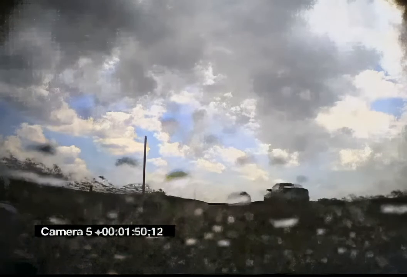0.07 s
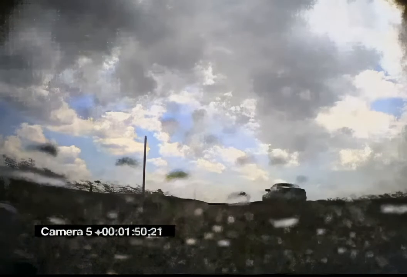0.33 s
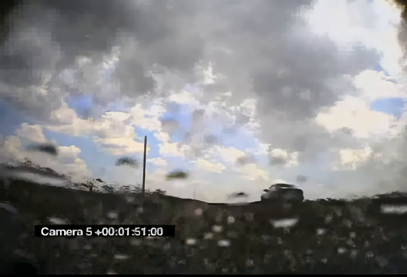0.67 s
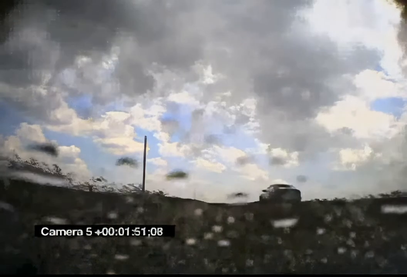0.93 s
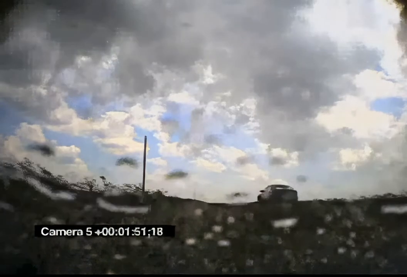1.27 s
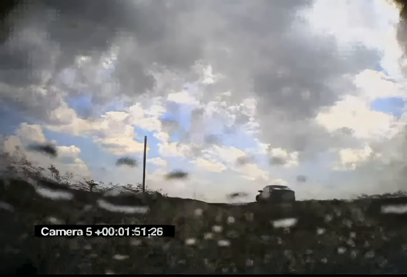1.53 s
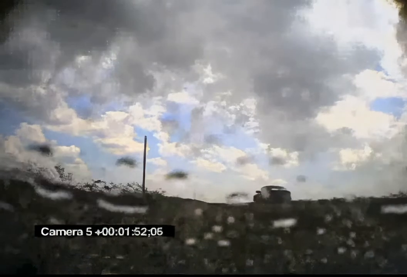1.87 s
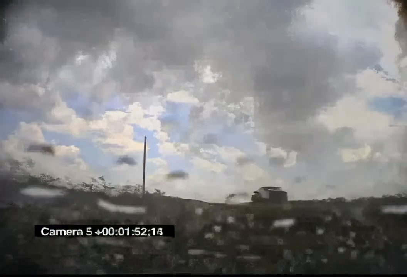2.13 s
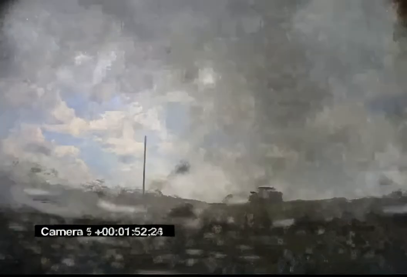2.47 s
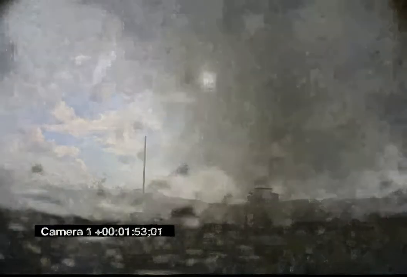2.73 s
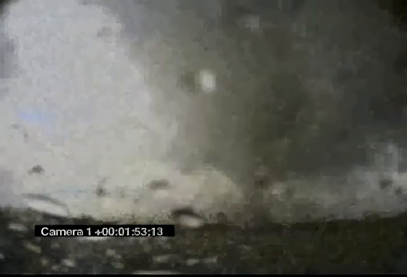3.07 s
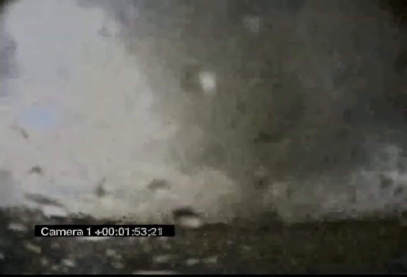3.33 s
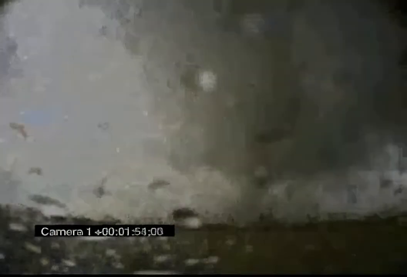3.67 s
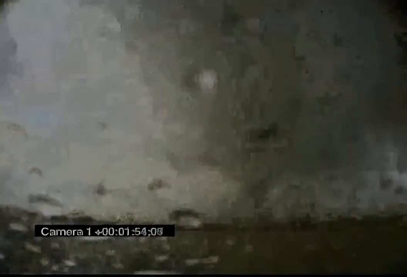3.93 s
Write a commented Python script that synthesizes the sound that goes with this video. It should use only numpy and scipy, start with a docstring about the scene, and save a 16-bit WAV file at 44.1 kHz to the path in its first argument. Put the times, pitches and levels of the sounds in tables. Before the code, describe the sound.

Heavy wind roars in uneven gusts over a microphone on the ground in open country, with deep, overloading thumps. Faint grit hisses and drops tick on the housing, more often in the second half, as the wind eases somewhat.

```python
"""Tornado over open country

A tornado crosses open country towards a camera on the ground, heard from its one microphone. Gusts roar over
the housing, tumble off it and buffet the microphone into overload. Grit hisses and drops tick right on the
case. One band of the treble is damped."""
import sys
import numpy as np
from scipy import signal
from scipy.fft import rfft, irfft
from scipy.io import wavfile
from scipy.ndimage import uniform_filter1d

SR = 44100
rng = np.random.default_rng(int(sys.argv[2]) if len(sys.argv) > 2 else 0)


def materialize(psi):
    """Save the field psi as 16-bit PCM at rate SR to the path in sys.argv[1].

    A 1-D psi becomes a single channel; in a 2-D psi each row is a channel.
    """
    bounded = np.clip(np.atleast_2d(psi).T, -1, 1)
    quanta = np.round(bounded * 32767).astype(np.int16)
    wavfile.write(sys.argv[1], SR, quanta)


N = 176400
T = np.arange(N) / SR
HZ = np.fft.rfftfreq(N, 1 / SR)


def amp(db):
    """Decibels to gain."""
    return 10 ** (np.asarray(db) / 20)


def unit(x):
    """Scales to rms 1."""
    return x / np.sqrt(np.mean(x ** 2) + 1e-20)


def level(curve):
    """Gain along a curve of time_s, level_db."""
    return amp(np.interp(T, *np.transpose(curve)))


def coloured(x, colour):
    """Filters x by a spectrum of frequency_hz, gain_db; rms 1."""
    hz, db = np.transpose(colour)
    gain = amp(np.interp(np.log(HZ + 1), np.log(hz), db))
    return unit(irfft(rfft(x) * gain, N))


def flutter(depth_db, cutoff_hz=110):
    """Quick random swings of gain, as small eddies pass."""
    band = HZ / (HZ + 12) ** 1.5 / (1 + (HZ / cutoff_hz) ** 2)
    swings = unit(irfft(rfft(rng.standard_normal(N)) * band, N))
    return unit(amp(depth_db * swings))


def flow(colour, steady_samples):
    """Coloured turbulence whose strength holds steady over the given span."""
    noise = coloured(rng.standard_normal(N), colour)
    power = uniform_filter1d(uniform_filter1d(noise ** 2, steady_samples), steady_samples)
    return noise / np.sqrt(power + 1e-9)


def add(mix, start_s, sound):
    """Mixes a sound in at a time."""
    part = mix[round(start_s * SR):][:len(sound)]
    part += sound[:len(part)]


def saturate(x, ceiling, knee):
    """Rounds off the peaks; a higher knee is harder."""
    return x / (1 + abs(x / ceiling) ** knee) ** (1 / knee)


# Grit and spray blown against the case at ground level: time_s, relative_level_db
GRIT_LEVEL = [(0.0, -34), (0.01, -34), (0.18, -37), (0.28, -28), (0.37, -39), (0.67, -37.5), (0.75, -39.5),
              (1.38, -37.5), (1.49, -31.5), (1.57, -38.5), (1.67, -33), (1.95, -34.5), (1.99, -43),
              (2.08, -35), (3.66, -45.5), (3.74, -36.5), (3.78, -43), (4.0, -47.5)]
# Its bright spectrum, heard from the case itself: frequency_hz, gain_db
GRIT_SPECTRUM = [(200, -22), (900, -8.5), (2000, 5.5), (3200, 4.5), (4300, 2), (7000, -3.5), (8500, -9),
                 (10000, -25.5), (12000, -60)]
def grit(gain_db=7, grains_per_s=1500, spread_db=1.5):
    """Fine spray hisses on the case, with separate grains of varied size."""
    sizes = amp(spread_db * np.minimum(rng.exponential(1, N), 4.5)) * rng.choice([-1, 1], N)
    strikes = rng.random(N) < grains_per_s / SR
    grains = coloured(sizes * strikes, GRIT_SPECTRUM)
    hiss = flow(GRIT_SPECTRUM, steady_samples=2000) * flutter(depth_db=3)
    return amp(gain_db) * level(GRIT_LEVEL) * (hiss + grains)


# Drops and debris on the case, right by the microphone: start_s, relative_level_db, ring_hz
CASE_HITS = [(0.245, 5, 2850), (1.577, -16.5, 3600), (1.6215, -9.5, 3200), (1.6224, -4, 4000),
             (1.6255, -6.5, 3000), (1.6625, -2, 2900), (1.927, -8.5, 3300), (2.061, -6, 3600),
             (2.192, -3, 3300), (2.3505, -10, 3560), (2.367, -12, 3600), (2.8767, -8, 3000),
             (2.951, -11.5, 3300), (3.059, -8.5, 2890), (3.1597, -11, 3440), (3.2793, -11.5, 2940),
             (3.299, -11.5, 3100), (3.407, -8, 2690), (3.5683, -13.5, 2890), (3.738, -10, 3010),
             (3.756, -16, 3300)]
def case_hits(gain_db=4.5, rise_s=0.00014, tick_decay_s=0.00036, knock_hz=1310, knock_decay_s=0.00048):
    """Each hit on the case is a crack, a few cycles of a high ring and a duller knock."""
    out, t = np.zeros(N), np.arange(400) / SR
    for start_s, level_db, ring_hz in CASE_HITS:
        crack = 0.24 * rng.standard_normal(len(t))
        tick = (np.sin(2 * np.pi * ring_hz * t) + crack) * np.exp(-t / tick_decay_s)
        knock = 0.28 * np.sin(2 * np.pi * knock_hz * t) * np.exp(-t / knock_decay_s)
        hit = (tick - knock) * (1 - np.exp(-t / rise_s))
        add(out, start_s, amp(level_db + gain_db) * hit / abs(hit).max())
    return out


# Single eddies on the housing, at point-blank range: start_s, length_s, level_db, pitch_hz
EDDY_SLAPS = [(0.151, 0.0091, -5, 34.8), (0.866, 0.0071, -5, 313), (1.177, 0.012, -10, 88),
              (1.425, 0.0072, -9.5, 500), (1.505, 0.051, -1, 149), (1.959, .018, -8, 73.4),
              (3.255, 0.016, -14.5, 40), (3.818, 0.0072, -13, 370)]
def eddy_slaps(sag=0.2, splash_db=-8.5):
    """Each eddy slaps the housing with a brief, sagging swing of pressure and a splash of roar."""
    out = np.zeros(N)
    roar_noise = amp(splash_db) * flow(ROAR_SPECTRUM, steady_samples=300)
    for start_s, length_s, level_db, pitch_hz in EDDY_SLAPS:
        progress = np.arange(0, length_s, 1 / SR) / length_s
        falling_hz = pitch_hz * (1 + sag * (0.5 - progress))
        swing = np.sin(2 * np.pi * np.cumsum(falling_hz) / SR)
        splash = roar_noise[round(start_s * SR):][:len(progress)]
        envelope = np.sin(np.pi * progress ** 0.52)  # quick rise, slower fall
        add(out, start_s, amp(level_db) * envelope * (swing + splash))
    return out


# Rumble close by, in the lee of the housing: time_s, relative_level_db
WAKE_LEVEL = [(0.0, -3), (0.02, -14.5), (0.58, -14.5), (0.65, -8.5), (0.85, -19), (0.86, -17.5),
              (1.01, -27), (1.07, -18), (1.12, -33.5), (1.18, -10.5), (1.25, -25.5), (1.55, -10.5),
              (1.59, -23.5), (1.8, -7), (1.96, -13), (1.99, -21.5), (2.06, -15), (2.38, -23), (2.56, -15.5),
              (2.83, -17), (2.87, -23.5), (3.22, -34), (3.26, -24.5), (3.41, -21.5), (3.43, -33.5),
              (3.55, -23), (3.61, -44.5), (3.64, -28), (3.84, -23), (4.0, -25.5)]
# Its low, hollow spectrum: frequency_hz, gain_db
WAKE_SPECTRUM = [(40, -21), (90, -4.5), (140, -1), (260, -1), (350, -4), (480, -9.5), (700, -36),
                 (2000, -69)]
def wake(gain_db=-1):
    """Flow tumbles off the housing with a hollow rumble."""
    rumble = flow(WAKE_SPECTRUM, steady_samples=1500) * flutter(depth_db=2.3)
    return amp(gain_db) * level(WAKE_LEVEL) * rumble


# Eddies directly on the microphone: time_s, level_db
BUFFET_LEVEL = [(0.0, -12), (0.03, -5.5), (0.12, -21), (0.15, -3.5), (0.18, -16.5), (0.46, -18.5),
                (0.48, -14), (0.6, -20), (0.63, -17.5), (0.83, -36), (0.88, -20), (0.98, -25), (1.15, -27),
                (1.19, -13.5), (1.29, -24.5), (1.32, -14), (1.38, -39), (1.41, -11.5), (1.68, -13),
                (1.75, -23), (1.8, -16.5), (1.85, -30), (1.97, -8.5), (2.0, -25), (2.21, -12), (2.33, -28),
                (2.57, -14.5), (3.0, -29.5), (3.03, -21.5), (3.09, -36.5), (3.2, -32), (3.26, -13.5),
                (3.33, -31), (3.41, -24.5), (3.45, -32), (3.54, -28.5), (3.58, -47.5), (3.81, -16.5),
                (3.89, -29), (4.0, -31)]
# Their bass-heavy spectrum: frequency_hz, gain_db
BUFFET_SPECTRUM = [(8, -19), (22, 0.5), (40, 1.5), (75, 4.5), (120, -6.5), (200, -8), (400, -33.5),
                   (1500, -63)]
def buffeting():
    """Eddies strike the microphone with deep thumps."""
    return level(BUFFET_LEVEL) * flow(BUFFET_SPECTRUM, steady_samples=1800) * flutter(depth_db=4.5)


# Wind speed at the camera, low on open ground, heard as roar: time_s, relative_level_db
ROAR_LEVEL = [(0.0, -11.5), (0.11, -13.5), (0.13, -5.5), (0.15, -19), (0.27, -9.5), (0.33, -13),
              (0.39, -21), (0.46, -11.5), (0.48, -16.5), (0.52, -11.5), (0.56, -17.5), (0.58, -15),
              (0.59, -12), (0.77, -16.5), (0.79, -25), (0.86, -21.5), (0.87, -20), (0.89, -25), (1.14, -27),
              (1.18, -16.5), (1.25, -32.5), (1.3, -25.5), (1.37, -29), (1.44, -13), (1.5, -12),
              (1.6, -31.5), (1.63, -20.5), (1.7, -10.5), (1.71, -17), (1.87, -12), (1.93, -19.5),
              (1.94, -17), (2.0, -27.5), (2.06, -17.5), (2.15, -16.5), (2.42, -24.5), (2.48, -11.5),
              (2.61, -22.5), (2.63, -15.5), (2.65, -17), (2.87, -23.5), (2.9, -33.5), (2.92, -23.5),
              (3.0, -37), (3.06, -28.5), (3.09, -34), (3.4, -25.5), (3.42, -31.5), (3.52, -27.5),
              (3.66, -37), (3.74, -24.5), (3.81, -32.5), (3.82, -27), (3.94, -30.5), (3.97, -23.5),
              (4.0, -29)]
# The roar's broad spectrum at the microphone: frequency_hz, gain_db
ROAR_SPECTRUM = [(60, -9.5), (250, -1.5), (400, 0), (590, -2), (740, .5), (1000, -1.5), (1400, -3),
                 (2000, -9), (3000, -17), (4300, -24.5), (7000, -29), (10000, -33)]
def roar(gain_db=1.5):
    """The wind rushes over the housing, fluttering as it swells and sinks."""
    rush = flow(ROAR_SPECTRUM, steady_samples=2000) * flutter(depth_db=1.95)
    return amp(gain_db) * level(ROAR_LEVEL) * rush


def scene():
    """Everything meets at one microphone on the ground."""
    return (roar() + buffeting() + wake() + eddy_slaps() + grit() + case_hits())[None]


def record(dry, damped_from_hz=4340, damped_to_hz=6740, damped_db=-51, top_hz=10400):
    """The microphone overloads, a treble band is damped, the loudest peaks clip and the top is cut."""
    overloaded = saturate(dry, ceiling=0.88, knee=3.8)
    in_band = (HZ > damped_from_hz) & (HZ < damped_to_hz)
    damped = irfft(rfft(overloaded) * amp(damped_db * in_band), N)
    clipped = saturate(damped, ceiling=0.61, knee=9)
    lowpass = signal.firwin(255, top_hz, window=("kaiser", 8), fs=SR)
    return signal.oaconvolve(clipped, lowpass[None], "same")


dry = scene()
out = record(dry)
materialize(out)
```